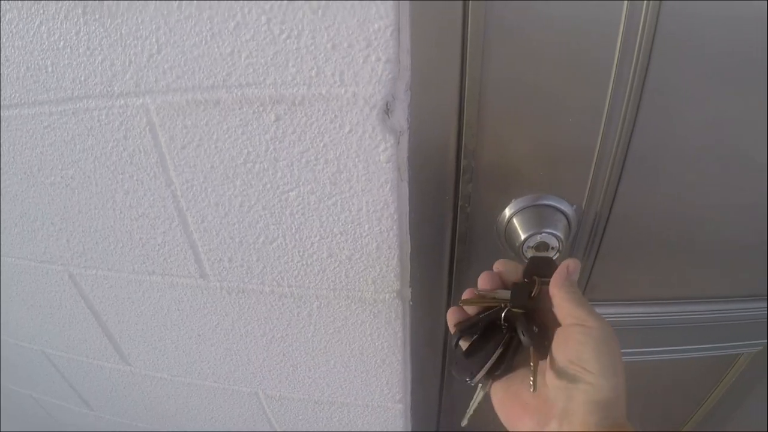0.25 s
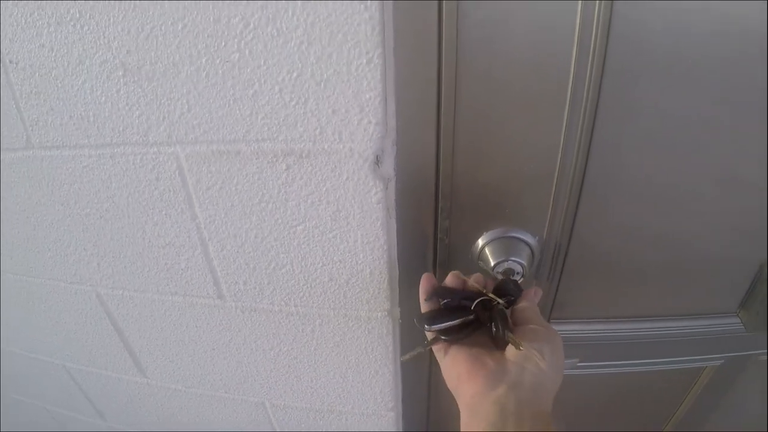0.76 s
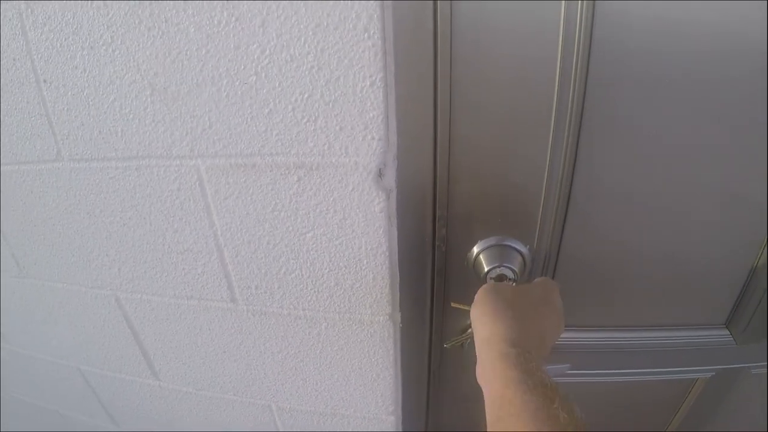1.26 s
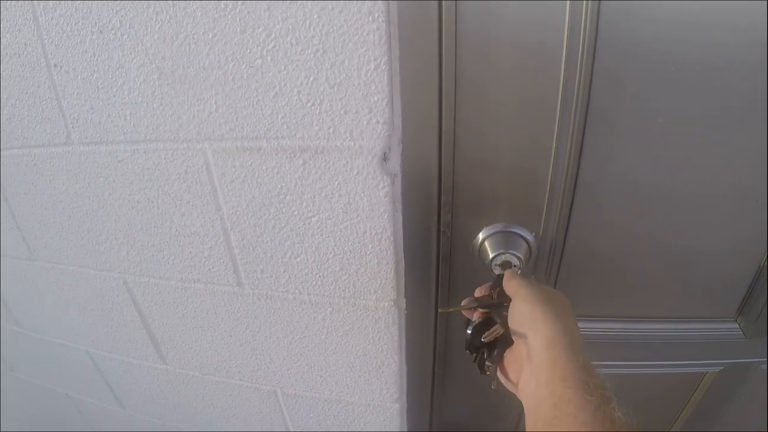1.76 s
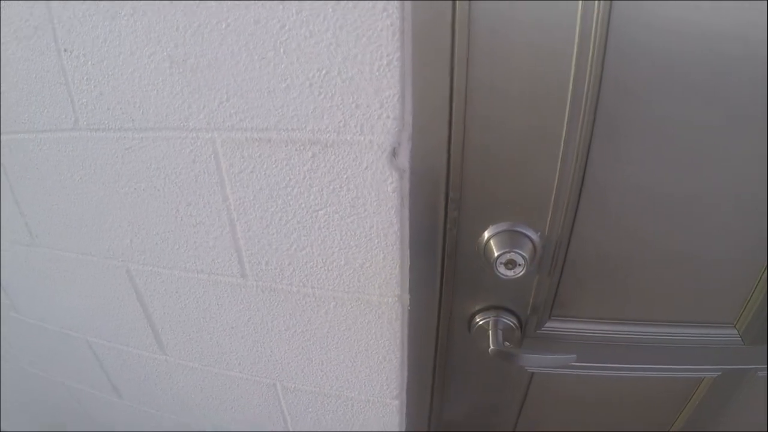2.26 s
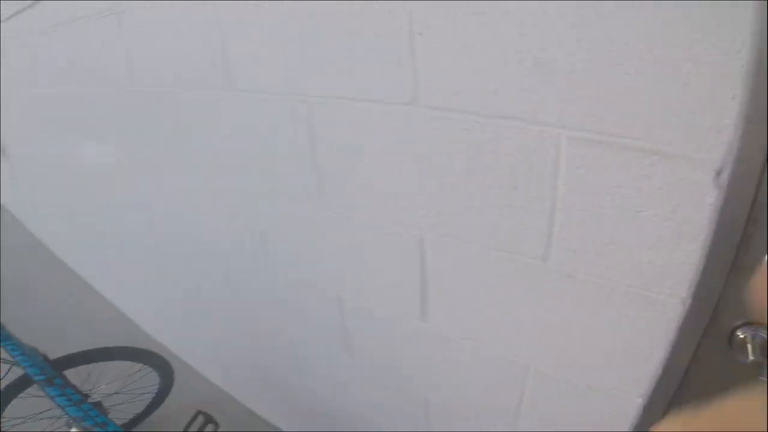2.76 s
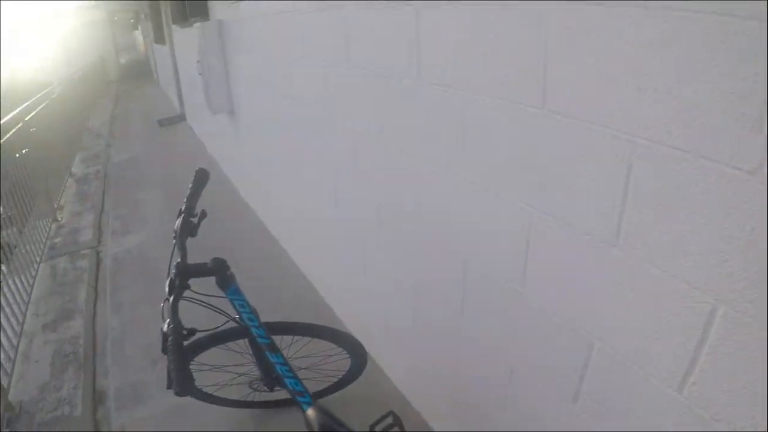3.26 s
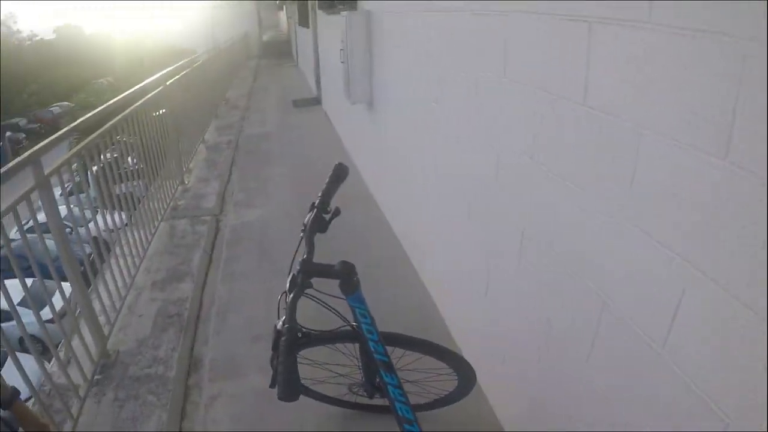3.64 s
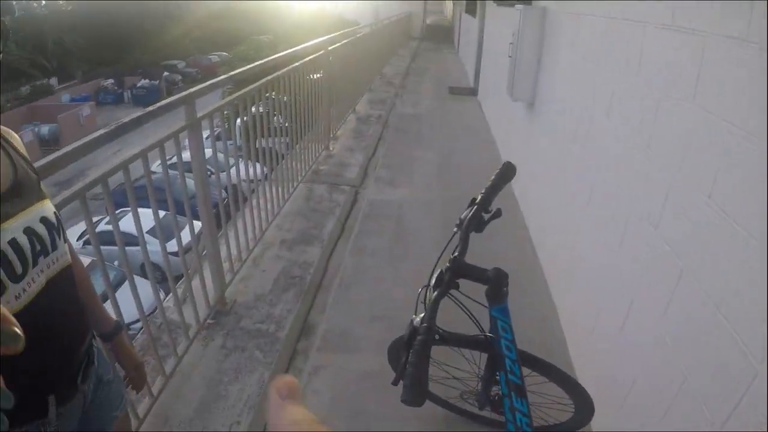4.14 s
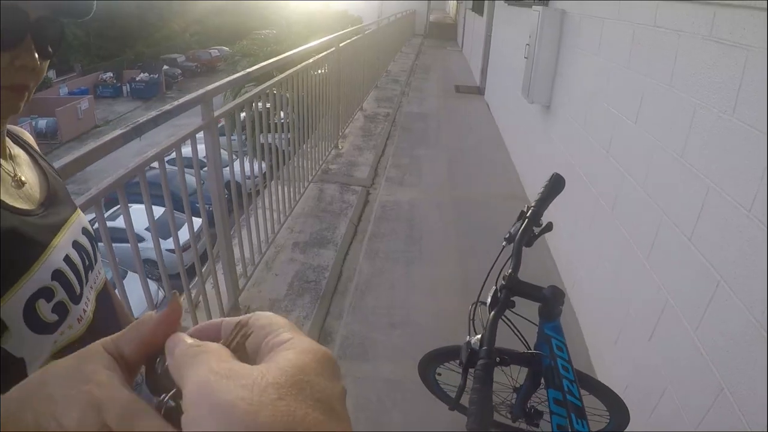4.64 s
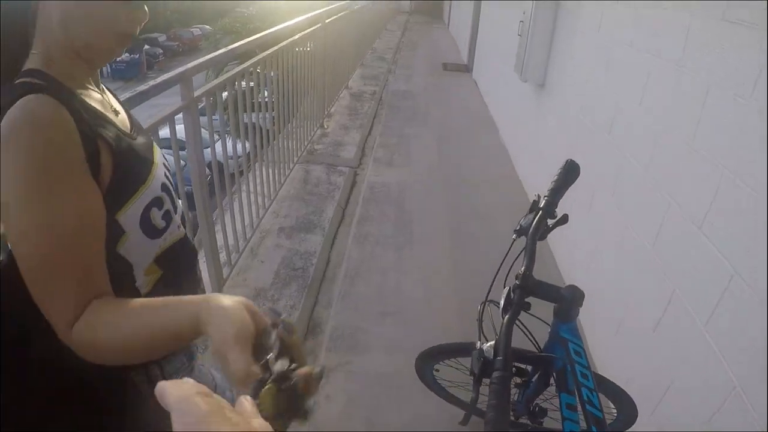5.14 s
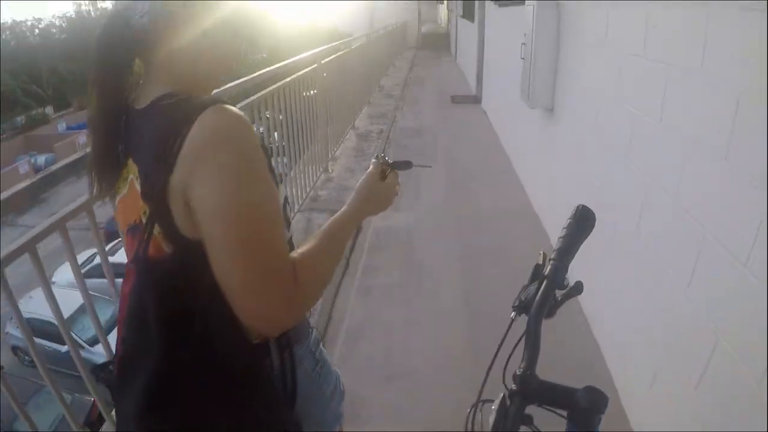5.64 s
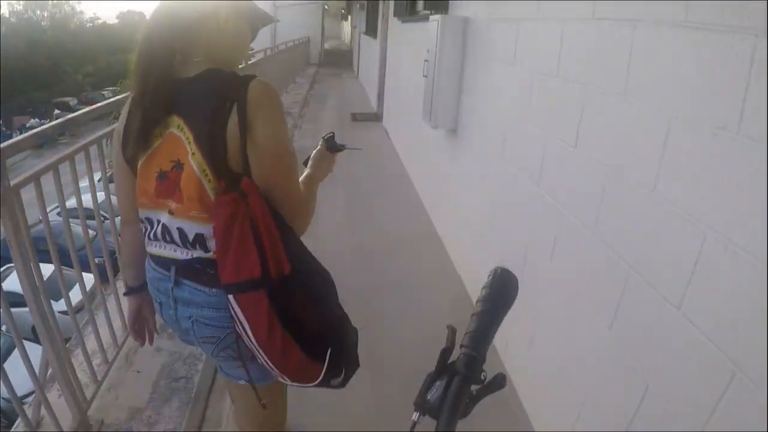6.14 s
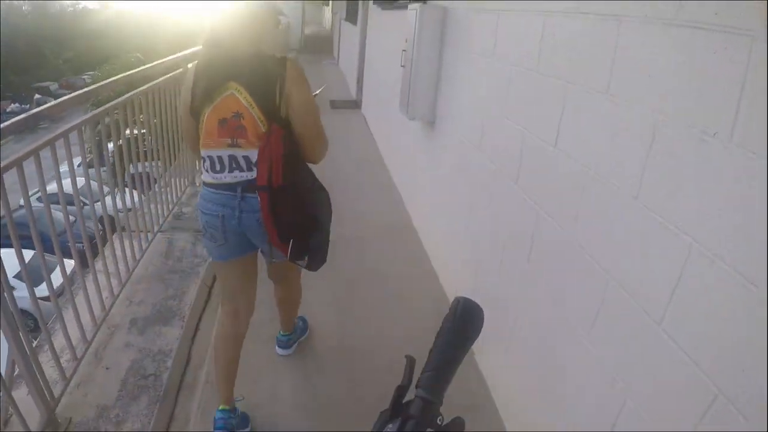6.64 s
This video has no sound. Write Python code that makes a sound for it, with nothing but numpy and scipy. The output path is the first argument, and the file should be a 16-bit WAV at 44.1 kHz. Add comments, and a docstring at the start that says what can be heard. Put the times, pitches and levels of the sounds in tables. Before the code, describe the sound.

On an outdoor walkway, a body-worn microphone picks up gusty wind and a faint town murmur. Close by, keys rattle brightly in a lock and a deadbolt clunks, ringing the metal door. Scraping fingers, hollow bumps and a brief squawk on the microphone case come next. The keys tinkle quietly and jangle once more as they are passed on, before a second bout of rubs and knocks and a few last clinks.

```python
"""Keys and deadbolt at a metal door

Keys clink and knock on the door while a deadbolt turns and rings it; the bunch is then handed on
along an open walkway. A body-worn camera hears wind on its ports, a midrange murmur, and fingers that
rub, knock and tap its hollow case. Its stereo picture folds to mono for a while after rough handling."""
import sys
import numpy as np
from scipy import signal
from scipy.fft import rfft, irfft, next_fast_len
from scipy.io import wavfile
from scipy.ndimage import uniform_filter1d, minimum_filter1d, map_coordinates

SR = 44100
rng = np.random.default_rng(int(sys.argv[2]) if len(sys.argv) > 2 else 0)


def wav_out(sig):
    """Save sig, one row per channel (or a flat mono array), as 16-bit PCM at SR to the path in sys.argv[1]."""
    wavfile.write(sys.argv[1], SR, np.round(np.clip(np.atleast_2d(sig).T, -1, 1) * 32767).astype(np.int16))


N = 304290
TOP_HZ = 15800

# key and lock contacts: t/s, level/dB, relative door knock/dB, brightest ring/Hz
CONTACTS = [(0.029, -16, -22, 7200), (0.0449, -12, -22, 7300), (0.0626, -7, -14, 7200),
            (0.1571, -22.5, -20, 6100), (0.1674, -12.5, -28, 7200), (0.2672, -10, -20, 6860),
            (0.2858, -20, -22, 6080), (0.3083, -22, -11, 5900), (0.3289, -21, -10, 7100),
            (0.389, -23.5, -10, 6060), (0.4239, -19, -8, 6100), (0.4825, -30, -8, 7100),
            (0.556, -29, -14, 6060), (0.612, -31, -14, 6060), (0.675, -31, -8, 6060),
            (0.9441, -24, -11.5, 6300), (0.9846, -9.5, -16, 3930), (1.0113, -7, -14, 5250),
            (1.0375, -20.5, -12, 3630), (1.1176, -21, -1, 5700), (1.1488, -20.5, 3, 5880),
            (1.1904, -10, -11.5, 6140), (1.245, -5.5, -18, 5400), (1.2581, -11.5, 2, 1990),
            (1.2729, -5, -15.5, 6390), (1.4088, -25, -15, 6800), (1.4484, -19.5, -22, 5900),
            (1.4684, -17.5, -16, 5850), (1.4936, -17.5, -18.5, 5740), (1.5519, -22.5, -24, 5800),
            (1.584, -24, -14, 6000), (1.628, -33, 6, 2000), (1.6979, -12, -20, 6160),
            (1.7746, -22, -24, 5900), (1.8497, -21, -18, 6100), (1.861, -14.5, -19, 5990),
            (1.8964, -15.5, -20, 5920), (1.9198, -21.5, -16, 3600), (1.9439, -15, -10, 5800),
            (1.9755, -11.5, -27, 5930), (2.098, -22, -14, 9400), (2.1043, -19, -18, 4030),
            (2.1478, -21, -26, 7200), (2.1638, -6, -30, 6070), (2.171, -9, -40, 5850),
            (2.1992, -19, -17, 6900), (2.302, -15, -17, 7000), (2.351, -28.5, -6.5, 2440),
            (2.3935, -20.5, -27, 7050), (2.6314, -24.5, -17, 6340), (3.2814, -28, -10, 8500),
            (3.8747, -27, -15.5, 3500), (3.906, -30.5, -6, 2200), (3.93, -30, -2, 2220),
            (4.024, -30, -8, 3700), (4.05, -27, -7, 6920), (4.1225, -34, -6, 5800), (4.2443, -29, -8, 5800),
            (4.338, -32, -6, 2400), (4.376, -31, -12, 5900), (4.392, -24, -10, 4050),
            (4.402, -28, -18, 5800), (4.419, -29, -14, 7100), (4.4563, -26, -21, 9300),
            (4.496, -32, -12, 5800), (4.517, -33, -10, 4050), (4.5611, -32.5, -11, 7500),
            (4.7336, -31.5, -10, 4300), (4.8778, -29.5, -10, 5260), (5.125, -31, -24, 6330),
            (5.2055, -23, -34, 8480), (5.2263, -11, -21, 8500), (5.2325, -11, -30, 8500),
            (5.2879, -17, -29, 5890), (5.3132, -19.5, -25, 7300), (5.3442, -22, -34, 7400),
            (5.3687, -17, -28, 4040), (6.0441, -20.5, -6, 4050), (6.118, -34, -30, 3700),
            (6.14, -33, -30, 5850), (6.1792, -32, -15, 8400)]
# door leaf and lock case modes: f/Hz, width/Hz, level/dB
DOOR_MODES = [(170, 22, 2), (350, 70, 0), (986, 65, 1.5), (1626, 400, -2.5), (2140, 190, -2)]


def amp(db):
    """Decibels to gain."""
    return 10 ** (np.asarray(db) / 20)


def unit(x):
    """Scale to rms 1."""
    return x / np.sqrt(np.mean(x ** 2) + 1e-20)


def along(points, hz):
    """Interpolate (f/Hz, value) points on a log axis."""
    f, v = np.transpose(points)
    return np.interp(np.log(hz + 1), np.log(f + 1), v)


def wobble(rate_hz):
    """Smooth random curve, rate_hz knots a second."""
    knots = rng.standard_normal(int(N * rate_hz / SR) + 4)
    return map_coordinates(knots, [np.arange(N) * rate_hz / SR])


def filtered(x, response):
    """Apply a complex frequency response."""
    size = next_fast_len(x.shape[-1] + 8192)
    return irfft(rfft(x, size) * response(np.fft.rfftfreq(size, 1 / SR)), size)[..., :x.shape[-1]]


def noise(spectrum, count=N):
    """Two independent noises of one colour, rms 1."""
    return unit(filtered(rng.standard_normal((2, count)), lambda hz: amp(along(spectrum, hz))))


def resonant(x, modes):
    """Parallel causal resonances of alternating sign."""
    return filtered(x, lambda f: sum(
        (-1) ** k * amp(db) * 1j * f * width_hz / (hz * hz - f * f + 1j * f * width_hz)
        for k, (hz, width_hz, db) in enumerate(modes)))


def add(track, start_s, sound):
    """Mix a short sound into a track."""
    start = round(start_s * SR)
    track[:, start:start + sound.shape[-1]] += sound[..., :N - start]


def background_gain():
    """The background drops briefly at four set moments."""
    # t/s, length/s, depth/dB
    dips = [(2.555, .06, 7), (3.56, .09, 9), (3.68, .18, 7), (5.93, .11, 13)]
    t, edge_s = np.arange(N) / SR, .015
    return amp(-sum(db * np.clip(np.minimum(t - s, s + length_s - t) / edge_s + .5, 0, 1)
                    for s, length_s, db in dips))


def wind_and_murmur():
    """Wind buffets the ports over a murmur: steady town air, swelling with lock and handling noise."""
    # t/s, wind and grip rumble/dB, murmur/dB
    levels = [(0.0, -29, -42), (0.92, -30, -47), (1.15, -27.5, -37), (1.38, -29, -47), (1.95, -30, -46.5),
              (2.17, -23.5, -47), (2.36, -30, -45), (2.75, -36, -47), (3.0, -23, -44.5), (3.11, -17, -32),
              (3.38, -16.5, -34), (3.54, -25, -40), (3.75, -37, -50), (4.1, -31, -45), (5.1, -38, -46),
              (5.66, -34, -46), (5.86, -15, -40), (5.96, -31, -46), (6.59, -29, -39.5), (6.9, -28, -44.5)]
    # wind spectrum: f/Hz, level/dB
    buffet = [(8.8, -18), (15, 4.5), (45, -2.5), (130, -15.5), (258, -26.5), (400, -34.5), (520, -60),
              (880, -120)]
    # murmur spectrum: f/Hz, level/dB
    midrange = [(88, -28), (150, -3), (678, -18), (1220, -18), (2730, -30.5), (3900, -33), (4500, -32),
                (5850, -70), (9900, -120)]
    times_s, *columns = np.transpose(levels)
    rumble_db, murmur_db = (np.interp(np.arange(N) / SR, times_s, column) for column in columns)
    rumble = amp(rumble_db + 5) * unit(amp(3.6 * wobble(14)) * noise(buffet))
    murmur = amp(murmur_db + 4 + 1.18 * wobble(13)) * noise(midrange)
    return background_gain() * (rumble + murmur)


def key_ring(t, bright_hz, spread_db, damping_per_s):
    """Key modes at random strengths and phases, favoured near bright_hz; a grip damps them."""
    # brass key modes: f/Hz, level/dB, t60/s
    modes = [(2190, -11, 0.038), (3650, -3, 0.031), (4053, -2, 0.045), (5400, -11, .04),
             (5810, -11.5, 0.053), (6060, -2, .07), (6410, -5.5, 0.023), (7180, -4.5, 0.088),
             (8500, -1.5, 0.038), (9300, -4, 0.05), (10400, -8, 0.05), (12200, -8, 0.05)]
    hz, db, t60_s = np.transpose(modes)[:, :, None]
    near_db = -34 * np.abs(np.log2(hz / bright_hz))
    strength, detune, phase = rng.standard_normal((3, 2, len(modes), 1))
    envelope = amp(db + near_db + spread_db * strength - 60 * t * (1 / t60_s + damping_per_s))
    return np.sum(envelope * np.sin(2 * np.pi * hz * (1 + .019 * detune[:1]) * t + 3 * phase), axis=1)


def sway():
    """Jingle envelope: the bunch sways on after each clink and stirs while fingers turn it."""
    # fingers turn the bunch: t/s, length/s, level/dB
    fiddling = [(0, .1, -43), (0.47, .27, -54), (1.3, .35, -48), (3.87, .21, -50), (4.37, .15, -52),
                (4.55, .4, -56), (6.1, .5, -52.5)]
    rest_db, kick_db, t60_s = -64, -37, 1.2
    t, kicks = np.arange(N) / SR, np.zeros(N)
    for s, db, *_ in CONTACTS:
        kicks[round(s * SR)] = amp(db + kick_db) ** 2
    sway_power = signal.lfilter([1], [1, -amp(-60 / (t60_s * SR)) ** 2], kicks)
    finger_power = sum((t > s) * (t < s + length_s) * amp(db) ** 2 for s, length_s, db in fiddling)
    return np.sqrt(amp(rest_db) ** 2 + sway_power + finger_power)


def jingle():
    """Tiny key touches tinkle and rustle over the treble hiss of the air."""
    # rustle and hiss spectrum: f/Hz, level/dB
    treble = [(1470, -18.5), (2500, -1), (6200, -2), (9810, -4), (12700, -17), (14900, -21.5), (16000, -71)]
    touches_per_s, keys_hz = 380, np.repeat([2200, 3650, 4050, 5900, 7140, 8550], 2)
    touches = (rng.random(N) < touches_per_s / SR) * amp(5 * rng.standard_normal(N))
    t, tinkle = np.arange(SR // 10) / SR, np.zeros((2, N))
    for hz in keys_hz:
        hits = touches * (rng.random(N) < 1 / len(keys_hz))
        tone = unit((1 - np.exp(-t / .0008)) * key_ring(t, hz, spread_db=5, damping_per_s=55))
        tinkle += signal.fftconvolve(hits[None], tone, axes=1)[:, :N]
    rustle = amp(-7 + 4.4 * wobble(35)) * noise(treble)
    hiss = amp(-57 + 1.5 * wobble(12)) * noise(treble)
    return background_gain() * (sway() * (amp(-2.5) * unit(tinkle) + rustle) + hiss)


def clinks():
    """Keys slide in, snap, then chatter and ring. Returns their sound and their blows on the door."""
    # contact noise spectrum: f/Hz, level/dB
    crack = [(1180, -15), (2000, -13.5), (2760, -13), (3710, -1), (4530, -10), (5830, 0.5), (7190, -1),
             (10400, -15), (13000, -22), (16000, -38)]
    slide_s, touches_per_s, loose_from_s = .008, 450, 5.0
    bunch, blows = np.zeros((2, 2, N))
    count = SR // 6
    t = np.arange(count) / SR
    ring_t, since_snap = t[:SR // 16], np.clip(t - slide_s, 0, None)
    snap = np.exp(-((t - slide_s - .0008) / .00062) ** 2)
    first_touch = np.arange(count) == round(slide_s * SR)
    for s, db, knock_db, bright_hz in CONTACTS:
        # pressed on the door, keys settle sooner; held loosely, later
        t60_s = (.036 - .0016 * knock_db) * (1.8 if s > loose_from_s else 1)
        decay = amp(-60 * since_snap / np.clip(t60_s, .005, .3))
        envelope = np.where(t < slide_s, amp(-11 - 2300 * (slide_s - t)), decay)
        chatter = (rng.random(count) < touches_per_s / SR) * envelope * rng.normal(0, .76, count)
        spectrum = [(hz, level_db - 2.5 * abs(np.log2(hz / bright_hz))) for hz, level_db in crack]
        rattle = noise(spectrum, count) * (amp(-14) * envelope + amp(-10.5) * snap)
        tone = key_ring(ring_t, bright_hz, spread_db=2.5, damping_per_s=.9 / t60_s)
        tone *= 1 - np.exp(-ring_t / .00048)
        chime = signal.fftconvolve((first_touch + chatter)[None], tone, axes=1)[:, :count]
        add(bunch, s - slide_s, amp(db) * (rattle + amp(-8) * chime))
        blow = (envelope + .81 * snap) * rng.standard_normal((2, count))
        add(blows, s - slide_s, amp(db + knock_db + 11) * blow)
    return bunch, blows


def doorway(door):
    """The recess adds a short reverberation to the door's sound."""
    t, t60_s, wet_db = np.arange(SR // 6) / SR, .24, -11
    tail = amp(-60 * t / t60_s) * rng.standard_normal((2, len(t)))
    tail /= np.linalg.norm(tail[0])
    return door + amp(wet_db) * signal.fftconvolve(door, tail, axes=1)[:, :N]


def case_hollow(covered, free):
    """Air in the case resonates under a finger or rings free; soft skin stirs little treble."""
    # hollow under a finger: f/Hz, width/Hz, level/dB
    covered_modes = [(540, 320, -7), (180, 180, 1)]
    # hollow ringing free: f/Hz, width/Hz, level/dB
    free_modes = [(635, 70, 1)]
    skin_hz = 1500
    hollow = resonant(covered, covered_modes) + resonant(free, free_modes)
    return filtered(hollow, lambda hz: 1 / (1 + 1j * hz / skin_hz) ** 2)


def finger_rubs():
    """Skin sticks and slips on the case. Returns the rasp and the drive to the hollow."""
    # t/s, length/s, rasp/dB, hollow groan/dB, tilt/(dB/octave)
    strokes = [(0.064, 0.03, -32, -36, -5), (1.91, 0.078, -34.5, -53, 7), (2.506, .042, -34, -37, -1.5),
               (2.693, 0.073, -40.5, -53, -0.5), (2.856, 0.051, -36, -53, -2),
               (2.941, 0.047, -41, -43, 1.5), (3.09, .18, -33, -22, 2), (3.05, 0.056, -27.5, -31.5, 3.5),
               (3.13, 0.068, -20, -26, 4), (3.216, 0.052, -21, -23.5, -2.5), (3.334, .012, -30, -40, 9),
               (3.353, .014, -33, -40, 9), (3.441, 0.12, -35, -22, 0.5), (3.868, 0.18, -47, -55, 2),
               (5.628, 0.075, -29, -32, 5.5), (5.705, 0.048, -37, -33.5, 6.5),
               (5.762, 0.05, -32, -28, -1.5), (5.832, 0.11, -40, -34, -1.5), (6.042, 0.042, -40, -42, 3.5)]
    # skin friction spectrum: f/Hz, level/dB
    friction = [(470, -28.5), (800, -3.5), (1300, -6), (1830, 1.5), (2500, -4), (5180, -14), (7640, -18),
                (12800, -38), (15200, -56)]
    slips_per_s, slip_decay_db = 95, 13
    cycle = np.cumsum(slips_per_s * amp(1.5 * wobble(30)) / SR) % 1
    grip = unit(uniform_filter1d(amp(2.2 * wobble(300) - slip_decay_db * cycle), size=SR // 500))
    out, drive = np.zeros((2, 2, N))
    for s, length_s, rasp_db, groan_db, tilt_db in strokes:
        count = round(length_s * SR)
        arch = np.clip(2.1 * np.sin(np.pi * np.arange(count) / count), 0, 1)
        pressure = arch * np.linspace(1.2, .7, count)
        slips = grip[round(s * SR):][:count]
        rasp = noise([(hz, db + tilt_db * np.log2(hz / 2500)) for hz, db in friction], count)
        add(out, s, amp(rasp_db) * pressure * slips ** .65 * rasp)
        add(drive, s, amp(groan_db + 22) * pressure * slips * rng.standard_normal((2, count)))
    return out, drive


def deadbolt():
    """The key seats and the bolt shoots; each snap rings the door's modes."""
    # t/s, level/dB, strongest ring/Hz
    snaps = [(.4238, -5, 2140), (1.1495, -15, 350), (1.247, -19, 170), (1.272, -20, 190)]
    out, t = np.zeros((2, N)), np.arange(SR // 4) / SR
    hz, width_hz, mode_db = np.transpose(DOOR_MODES)[:, :, None]
    rings = np.exp(-np.pi * width_hz * t) * np.sin(2 * np.pi * hz * t)
    for s, db, near_hz in snaps:
        scatter_db = rng.normal(0, 2.5, (2, len(DOOR_MODES), 1))
        level_db = db + mode_db - 20 * np.abs(np.log2(hz / near_hz)) + scatter_db
        add(out, s, np.sum(amp(level_db) * rings, axis=1))
    return out


def case_thumps():
    """A knock on the case swings the ports for about two cycles."""
    # t/s, level/dB, f/Hz
    knocks = [(0.625, -14, 70), (0.643, -11.5, 60), (1.318, -13, 55), (1.341, -13, 50), (2.084, -6.5, 32.3),
              (2.115, -8, 32.7), (2.16, -10.5, 48), (2.522, -4.5, 40), (2.542, -7, 120), (2.932, 4, 41.3),
              (3.054, -1, 42), (3.3, -9, 31.7), (3.388, -7, 32.3), (3.418, -2, 76), (3.619, -6, 27),
              (3.665, -4, 50), (5.678, -5, 170), (5.689, 2, 163), (5.78, -1, 210), (5.789, -4, 90),
              (5.798, -2, 81), (5.84, -7, 36), (5.898, 3.5, 138), (5.912, -1, 170), (5.918, -1, 120),
              (6.042, -9, 32)]
    out, t = np.zeros((2, N)), np.arange(SR // 8) / SR
    for s, db, hz in knocks:
        swing = np.sin(2 * np.pi * hz * t) * amp(db + 5 - 17 * hz * t) * (1 - np.exp(-12 * hz * t))
        add(out, s, swing * np.array([[1], [rng.choice([-1.6, 1.6])]]))
    return out


def nail_taps():
    """Fingernails strike the case. Returns the clicks and the impulses to the hollow."""
    # t/s, level/dB, relative hollow ring/dB, click centre/Hz
    taps = [(2.5399, -8.5, -24, 2000), (3.0556, -9, -8, 1800), (3.4036, -3, -10, 2200),
            (3.4167, -12, -3, 2000), (3.6645, -10, -8, 2200), (5.7872, -7, -31, 2300),
            (5.8621, -11, -16, 3800), (5.9, -3, -8, 1900), (5.914, -24, 20, 2000), (5.9247, -15, 0.5, 2200),
            (6.4607, -26, -14, 2000)]
    out, drive = np.zeros((2, 2, N))
    t = np.arange(SR // 8) / SR
    for s, db, hollow_db, hz in taps:
        click = noise([(hz / 6, -15), (hz, 0), (hz * 2, -12), (TOP_HZ, -46)], len(t))
        add(out, s - .002, amp(db - 6) * np.exp(-((t - .003) / .0011) ** 2) * click)
        add(drive, s, amp(db + hollow_db + 38) * np.array([[1], [rng.normal()]]))
    return out, drive


def squawk():
    """A dragging finger sounds the hollow as a narrow, unsteady band that sags."""
    start_s, length_s, level_db = 3.443, .115, -16.5
    from_hz, to_hz, width_hz = 670, 550, 95
    out, count = np.zeros((2, N)), round(length_s * SR)
    phase = 2 * np.pi * np.cumsum(np.linspace(from_hz, to_hz, count)) / SR
    in_phase, quadrature = (unit(filtered(white, lambda hz: 1 / (1 + (hz / width_hz) ** 2)))
                            for white in rng.standard_normal((2, 2, count)))
    band = in_phase * np.cos(phase) + quadrature * np.sin(phase)
    add(out, start_s, amp(level_db) * signal.windows.tukey(count, .25) * band)
    return out


def stereo_width():
    """Side gain: sinks during each fold to mono and climbs back by its end."""
    # start/s, open again/s
    folds = [(3.66, 5.6), (6.05, 7.5)]
    fold_db_per_s, open_db_per_s, depth_db = 70, 120, 58
    t = np.arange(N) / SR
    ramps_db = [np.minimum(fold_db_per_s * (t - start_s), open_db_per_s * (end_s - t))
                for start_s, end_s in folds]
    return amp(-np.clip(ramps_db, 0, depth_db).sum(axis=0))


def scene():
    """Mix to left and right; row 0 of a source is common to both ports, row 1 their difference."""
    # lean of the metal sounds to the left port: f/Hz, share
    leftward = [(2500, -0.25), (4400, .7), (8000, 0.74), (14000, -0.44)]
    # difference between the ports: f/Hz, side gain/dB
    spread = [(60, -21), (200, -8), (380, -4.5), (700, 5.5), (1290, 5), (2380, -1), (4400, -7.5), (8120, 3),
              (15000, -2.5)]
    bunch, blows = clinks()
    metal = bunch + doorway(resonant(blows, DOOR_MODES) + deadbolt()) + jingle()
    background = wind_and_murmur()
    rasps, rub_drive = finger_rubs()
    thumps = case_thumps()
    clicks, tap_drive = nail_taps()
    hollow = case_hollow(covered=rub_drive + tap_drive / 2, free=tap_drive)
    rest = background + rasps + thumps + clicks + hollow + squawk()
    leaning = filtered(metal[0], lambda hz: along(leftward, hz))
    diffuse = filtered(metal[1], lambda hz: np.sqrt(1 - along(leftward, hz) ** 2))
    side = filtered(leaning + diffuse + rest[1], lambda hz: amp(along(spread, hz)))
    mid = metal[0] + rest[0]
    return np.array([mid + side, mid - side])


def record(dry):
    """The camera narrows its stereo picture, limits peaks and passes 6 Hz to TOP_HZ."""
    mid, side = dry.mean(axis=0), (dry[0] - dry[1]) / 2 * stereo_width()
    pair = filtered(np.array([mid + side, mid - side]), lambda hz: hz > 6)
    needed_gain = 1 / np.maximum(np.abs(pair).max(axis=0), 1)
    gain = uniform_filter1d(minimum_filter1d(needed_gain, size=SR // 300), size=SR // 300)
    return filtered(pair * gain, lambda hz: hz < TOP_HZ)


dry = scene()
out = record(dry)
wav_out(out)
```